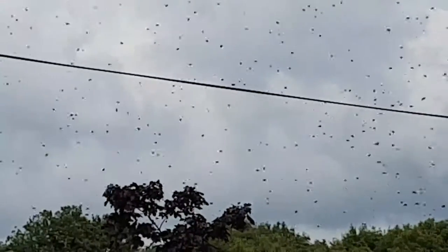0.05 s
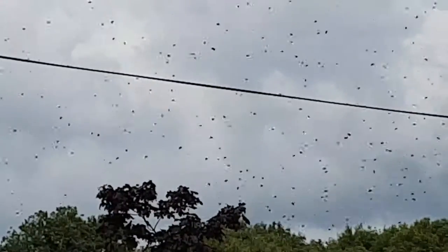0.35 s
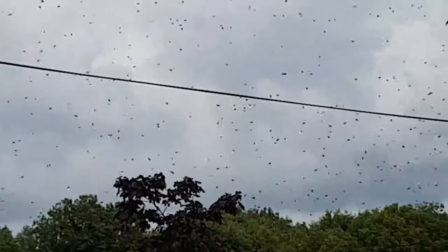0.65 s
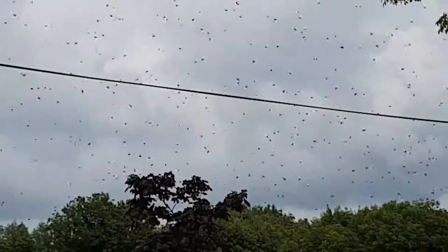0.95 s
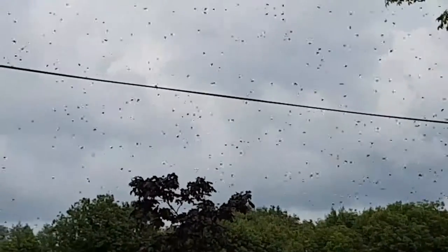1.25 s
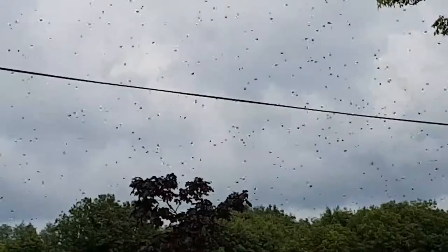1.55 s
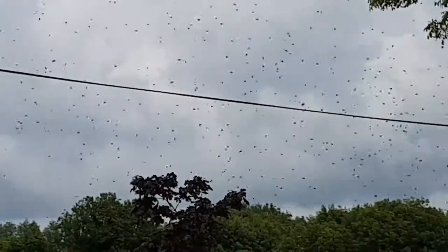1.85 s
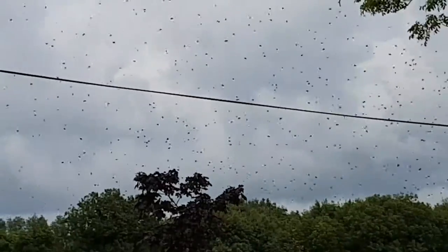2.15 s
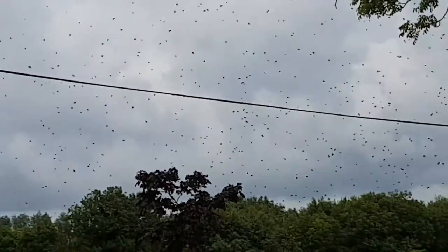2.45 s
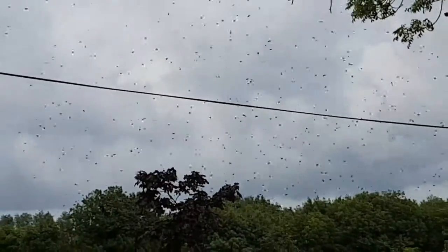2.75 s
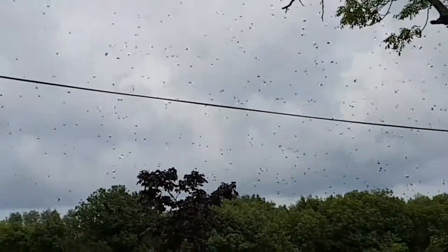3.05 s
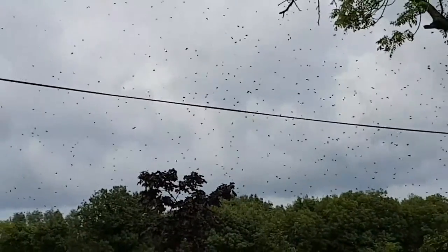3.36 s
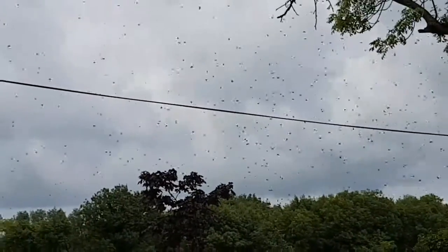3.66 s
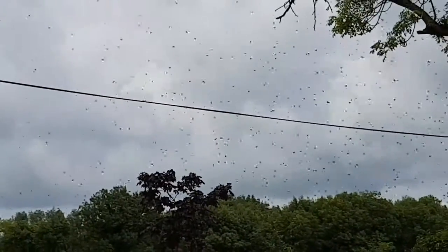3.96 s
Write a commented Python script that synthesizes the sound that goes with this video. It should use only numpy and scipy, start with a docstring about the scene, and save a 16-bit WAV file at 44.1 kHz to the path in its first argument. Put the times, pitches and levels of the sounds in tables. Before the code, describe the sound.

A swarm of bees hums steadily outdoors as a passing vehicle fades away.

```python
"""A garden, where a swarm of honeybees circles, their wingbeats merging into one broad hum.
A passing vehicle's engine drone and tyre roar fade away in the first second or so. Small birds
chirp and whistle faintly over a soft outdoor hiss, their calls scattered by the trees.
At the end a light breeze brushes the microphone."""
import sys
import numpy as np
from scipy import signal
from scipy.fft import rfft, irfft
from scipy.io import wavfile
from scipy.ndimage import uniform_filter1d

SR = 44100
rng = np.random.default_rng(int(sys.argv[2]) if len(sys.argv) > 2 else 0)


def inscribe(sig):
    """Save sig as 16-bit PCM at rate SR to the path in sys.argv[1].

    A 1-D sig is mono; a 2-D sig holds one channel per row.
    Samples are clipped to [-1, 1] before scaling.
    """
    pcm = np.round(np.clip(np.atleast_2d(sig).T, -1, 1) * 32767)
    wavfile.write(sys.argv[1], SR, pcm.astype(np.int16))


N = 176400
T = np.arange(N) / SR


def amp(db):
    """Decibels to gain."""
    return 10 ** (np.asarray(db) / 20)


def unit(x):
    """Scales to rms 1."""
    return x / np.sqrt(np.mean(x ** 2) + 1e-20)


def curve(points, t=T):
    """An automation lane: straight lines between breakpoints."""
    return np.interp(t, *np.transpose(points))


def spectrum(points, hz):
    """Reads (f/Hz, value) breakpoints on a log frequency axis."""
    f, value = np.transpose(points)
    return np.interp(np.log(hz + 1), np.log(f + 1), value)


def drift(rate_hz):
    """Smooth random modulation of rms 1: sixteen sines below the given rate."""
    t = np.linspace(0, N / SR, 1000)
    hz = rate_hz * rng.uniform(.1, 1, (16, 1))
    sines = np.sin(2 * np.pi * (hz * t + rng.random(hz.shape))) / np.sqrt(hz)
    return np.interp(T, t, unit(sines.sum(0)))


def pan(db):
    """Left and right gains; pan is left minus right in dB."""
    return amp([[db / 2], [-db / 2]])


def add(mix, start, sound):
    """Drops a stereo sound into the mix at start seconds."""
    part = mix[:, round(start * SR):][:, :sound.shape[1]]
    part += sound[:, :part.shape[1]]


# Stereo image of the noise beds: f/Hz, left-right correlation
COHERENCE = [(60, 0.4), (130, 0.77), (290, 0.72), (640, 0.6), (1400, -0.06), (3100, 0.55), (7000, 0)]
def noise(colour, patchy_db, size=2048):
    """A diffuse stereo bed of rms 1, with patches of its spectrum swelling and sinking."""
    hz, hop = np.fft.rfftfreq(size, 1 / SR), size // 4
    a, b, c, d, patches = rng.standard_normal((5, N // hop + 5, len(hz)))
    patches = uniform_filter1d(patches, size=7, axis=0)  # smooth in time
    patches = unit(uniform_filter1d(patches, size=14, axis=1))  # and in frequency
    shared = np.clip(spectrum(COHERENCE, hz), -1, 1)
    left = a + 1j * b
    right = shared * left + np.sqrt(1 - shared ** 2) * (c + 1j * d)
    frames = np.array([left, right]) * amp(spectrum(colour, hz) + patchy_db * patches)
    _, bed = signal.istft(frames.swapaxes(1, 2), nperseg=size, noverlap=size - hop)
    return unit(bed[:, :N])


# Timbre of one bee: harmonic of the wingbeat, relative level/dB
WING_HARMONICS = [(1, -8.5), (2, 0), (3, -8.5), (4, -2.5), (5, -4.5), (6, -7.5), (7, -11), (8, -9),
                  (10, -15), (14, -20), (24, -34)]
# Fader ride on the whole swarm: t/s, level/dB
SWARM_LEVEL = [(0, -54), (1, -56), (1.6, -57.5), (2.3, -58.5), (3, -58), (4, -59)]
def swarm(bees=64, wing_hz=251.44, ear_delay_s=.00029):
    """Each bee loops one wing stroke at its own wandering rate, drifting nearer and farther."""
    harmonics = amp(curve(WING_HARMONICS, np.arange(1, 25)))
    size = 1024  # wavetable samples per stroke
    hum = np.zeros((2, N))
    for detune in unit(signal.detrend(rng.standard_normal(bees), type="constant")):
        phases = np.exp(2j * np.pi * rng.random(len(harmonics)))
        stroke = irfft(np.r_[0, harmonics * phases], size)
        wander, jitter = .026 * drift(rate_hz=5), .006 * drift(rate_hz=29.99)
        beats = np.cumsum(wing_hz * (1 + .043 * detune + wander + jitter)) / SR
        side = rng.uniform(-1, 1)
        lead = side * ear_delay_s * wing_hz / 2  # the nearer ear hears each stroke first
        playhead = (np.array([beats + lead, beats - lead]) * size).astype(int) % size
        flyby_db = 3 * drift(rate_hz=1.2)
        hum += stroke[playhead] * amp(flyby_db) * pan(db=3 * side)
    return unit(hum) * amp(curve(SWARM_LEVEL))


# The engine's firing rate: t/s, f/Hz
FIRING_RATE = [(0, 60.5), (.11, 58.9), (.25, 58.5), (.45, 57.8), (.9, 57), (1.3, 55.5), (2, 54.6),
               (4, 54.4)]
# Fader ride on the firing tone: t/s, level/dB
DRONE_LEVEL = [(0, -42.5), (.17, -45), (.28, -47), (.38, -52), (.5, -51), (.7, -57), (.92, -59), (1.1, -69),
               (1.4, -86), (2, -82), (3, -87), (4, -90)]
# Fader ride on its octave: t/s, level/dB
OCTAVE_LEVEL = [(0, -44), (.09, -62), (.16, -46.5), (.27, -46.5), (.38, -42.5), (.5, -53), (.6, -58),
                (.7, -52), (.81, -52.5), (.89, -72), (1.3, -76.5), (4, -81.5)]
def engine(overtone_db=-16.5):
    """A low firing tone and its octave sag in pitch and fade as the vehicle draws away."""
    phase = 2 * np.pi * np.cumsum(curve(FIRING_RATE)) / SR
    flutter_db = np.interp(T, [0, 2], [-.6, 2.2])  # moving air adds more flutter from afar
    overtones = sum(np.sin(k * phase + drift(rate_hz=8)) for k in (4, 5))
    tone = np.sin(phase) + amp(overtone_db) * overtones
    drone = amp(curve(DRONE_LEVEL) + flutter_db * drift(rate_hz=5)) * tone
    octave = amp(curve(OCTAVE_LEVEL) + flutter_db * drift(rate_hz=9.4)) * np.sin(2 * phase)
    return np.sqrt(2) * (drone + octave)


# EQ of tyres on the road: f/Hz, relative level/dB
TYRE_EQ = [(25, -13), (45, -1.5), (100, 2), (165, -7), (205, 2.5), (280, 0.5), (320, -6.5), (420, -6.5),
           (490, -5), (640, -5), (790, -13), (1020, -6), (1400, -14), (2200, -18.5), (3200, -23),
           (4200, -28.5), (7800, -37.5), (9500, -57), (15000, -58)]
# Fade-out as the vehicle leaves: t/s, level/dB
TYRE_LEVEL = [(0, -42.5), (.11, -41.5), (.28, -45), (.45, -45.5), (.6, -46.5), (.8, -50.5), (1, -53),
              (1.25, -59.5), (1.7, -64), (2.5, -70), (4, -74)]
def tyres(crossover_hz=350):
    """Road roar fades with distance, its rumble first."""
    roar = noise(TYRE_EQ, patchy_db=2.3)
    level_db = curve(TYRE_LEVEL)
    rumble = signal.sosfiltfilt(signal.butter(2, crossover_hz, fs=SR, output="sos"), roar)
    rumble_cut_db = .43 * (level_db - level_db.max())
    return amp(level_db) * (roar - rumble + rumble * amp(rumble_cut_db))


# EQ of the outdoor hiss: f/Hz, relative level/dB
AIR_EQ = [(20, -7), (55, -10), (130, -2), (190, -5), (350, 1), (650, 0), (1200, -5), (2200, -6),
          (3300, -11.5), (5000, -13.5), (7900, -15), (9300, -23.5), (12500, -21), (15800, -23.5)]
# Fader ride on that hiss: t/s, level/dB
AIR_FADE = [(0, -54.5), (1.2, -57.5), (2.3, -59), (3.2, -60.5), (4, -60.5)]
def air():
    """A soft bed of outdoor hiss eases down under everything."""
    return noise(AIR_EQ, patchy_db=1.52) * amp(curve(AIR_FADE))


def mic_hiss(level_db=-75):
    """The microphones' own steady white noise."""
    return amp(level_db) * rng.standard_normal((2, N))


def bird_note(hz, db, attack=1):
    """One fluttering note swells and fades along a pitch path; attack under 1 peaks earlier."""
    swell = abs(np.sin(np.pi * np.linspace(0, 1, len(hz)) ** attack))
    flutter = 1 + .01 * drift(rate_hz=152)[:len(hz)]
    return np.sqrt(2) * amp(db) * swell * np.sin(2 * np.pi * np.cumsum(hz * flutter) / SR)


# Quick chirps: t/s, length/s, first f/Hz, last f/Hz, level/dB, pan/dB, reverb send/dB
BIRD_CHIRPS = [(.085, 0.06, 6450, 5540, -64, -3, -7), (0.432, 0.05, 6800, 5360, -70, -20.5, -1),
               (1.395, 0.043, 3000, 4710, -66, 7, -2), (1.665, 0.045, 4200, 5130, -70, -5, 0),
               (1.923, 0.043, 3730, 4880, -70, 4, 2), (2.055, 0.064, 7870, 5750, -73, -5, 5),
               (2.247, .055, 7900, 4600, -71, -7, 4.5), (2.302, 0.042, 4000, 3650, -67, 7, 0),
               (2.458, .04, 7500, 5250, -74, -10, 3), (3.825, .04, 3400, 4860, -64, 7, 1.5),
               (3.96, .05, 6450, 6300, -71, -2, -3)]
# Thin whistles: t/s, length/s, settled f/Hz, level/dB, pan/dB, reverb send/dB
BIRD_WHISTLES = [(1.243, 0.11, 5170, -70, -10, 3), (2.917, 0.088, 3610, -73.5, 4, 1.5),
                 (3.68, 0.1, 5170, -71, -7, 3)]
def birds(drop_hz=380, settle_s=.0159, predelay_s=.035):
    """Chirps sweep and whistles drop onto a held pitch, each echoed by the trees."""
    calls = []
    for start, length, first_hz, last_hz, db, pan_db, send_db in BIRD_CHIRPS:
        sweep = np.linspace(0, 1, int(length * SR)) ** 1.1
        pitch = first_hz + (last_hz - first_hz) * sweep
        calls.append((start, bird_note(pitch, db), pan_db, send_db))
    for start, length, hz, db, pan_db, send_db in BIRD_WHISTLES:
        pitch = hz + drop_hz * np.exp(-T[:int(length * SR)] / settle_s)
        calls.append((start, bird_note(pitch, db, attack=.48), pan_db, send_db))
    direct, send = np.zeros((2, 2, N))
    for start, call, pan_db, send_db in calls:
        add(direct, start, call * pan(pan_db))
        add(send, start + predelay_s, call * pan(pan_db / 2) * amp(send_db))
    return direct + tree_scatter(send)


def tree_scatter(send, t60_s=.36):
    """The trees scatter each call into a short, diffuse reverb tail."""
    t = T[:SR // 2]
    tail = rng.standard_normal((2, len(t))) * amp(-60 * t / t60_s)
    return signal.fftconvolve(send, tail / np.linalg.norm(tail[0]), axes=1)[:, :N]


# EQ of wind on the microphone: f/Hz, relative level/dB
BREEZE_EQ = [(20, -10), (50, -2), (90, 0), (160, -10), (300, -16), (600, -46), (3000, -60)]
# Fader ride on the closing puffs: t/s, level/dB
BREEZE_LEVEL = [(3.55, -88), (3.63, -66), (3.7, -77), (3.82, -65), (4, -63)]
def breeze():
    """Light puffs brush the microphone with a soft, low rumble."""
    return noise(BREEZE_EQ, patchy_db=3.5) * amp(curve(BREEZE_LEVEL))


def scene():
    """The garden mix: bees, departing vehicle, birds and breeze over the hiss."""
    return swarm() + engine() + tyres() + birds() + breeze() + air() + mic_hiss()


# Balance of the microphone pair: f/Hz, left minus right level/dB
MIC_BALANCE = [(60, -1.8), (400, 1), (700, 0), (1300, -2), (2400, -1.5), (4400, -2.5), (8000, -3.5),
               (15000, 0)]
def record(dry, left_delay_s=.0001, high_cut_hz=15800):
    """The right microphone is a little earlier and brighter; a steep high cut trims both sides."""
    hz = np.fft.rfftfreq(2 * N, 1 / SR)
    balance_db = spectrum(MIC_BALANCE, hz)
    delay = np.exp(-2j * np.pi * hz * left_delay_s)
    response = np.array([amp(balance_db / 2) * delay, amp(-balance_db / 2)])
    heard = irfft(rfft(dry, 2 * N) * response)[:, :N]
    high_cut = signal.firwin(511, high_cut_hz, window=("kaiser", 9), fs=SR)
    return signal.oaconvolve(heard, high_cut[None], "same")


dry = scene()
out = record(dry)
inscribe(out)
```